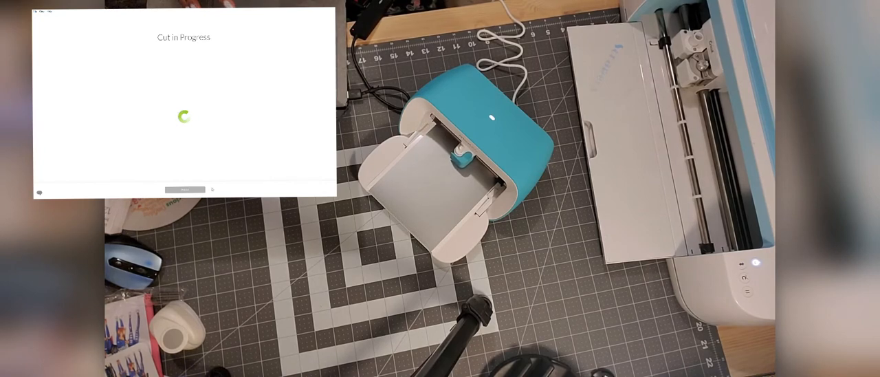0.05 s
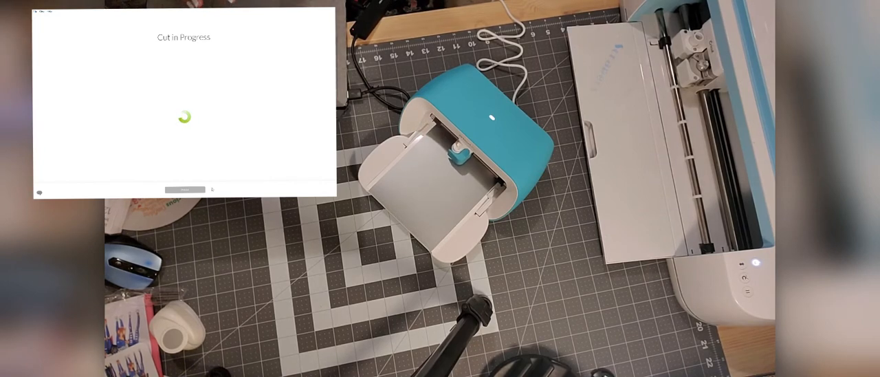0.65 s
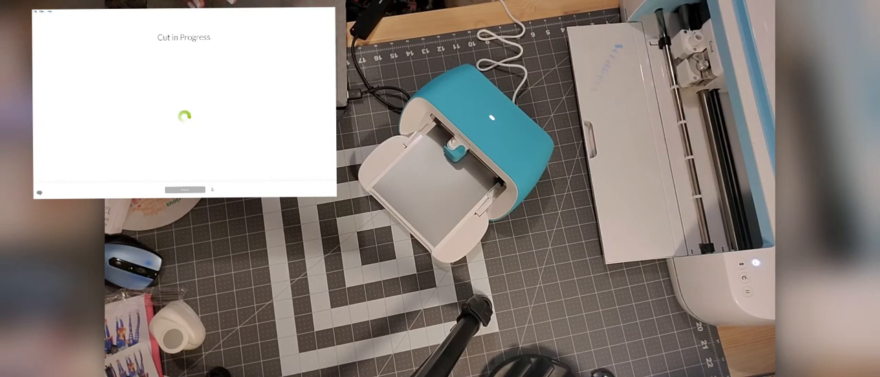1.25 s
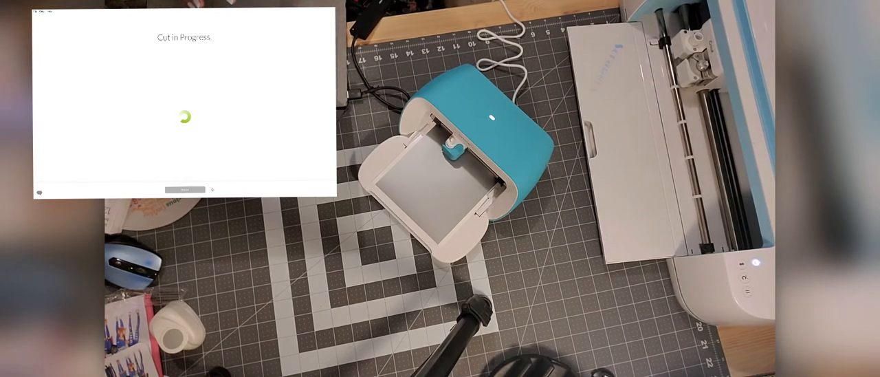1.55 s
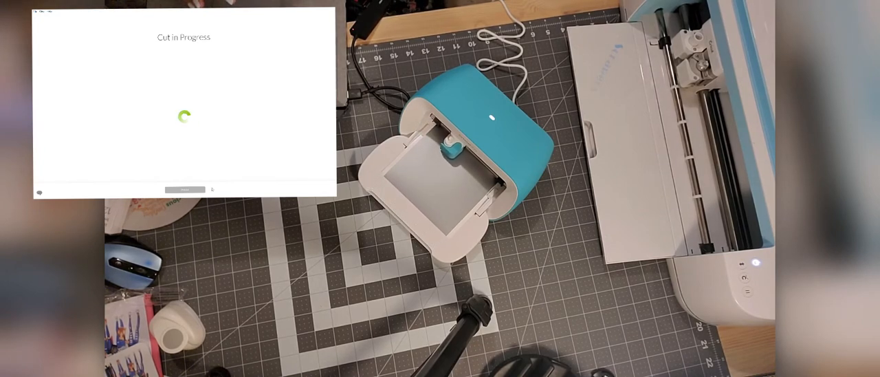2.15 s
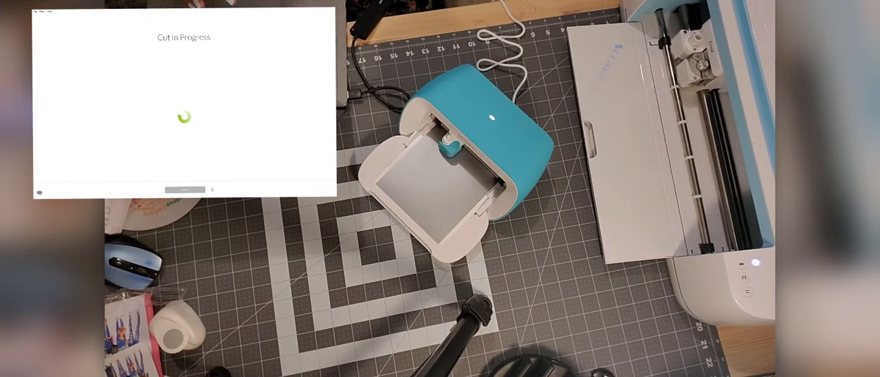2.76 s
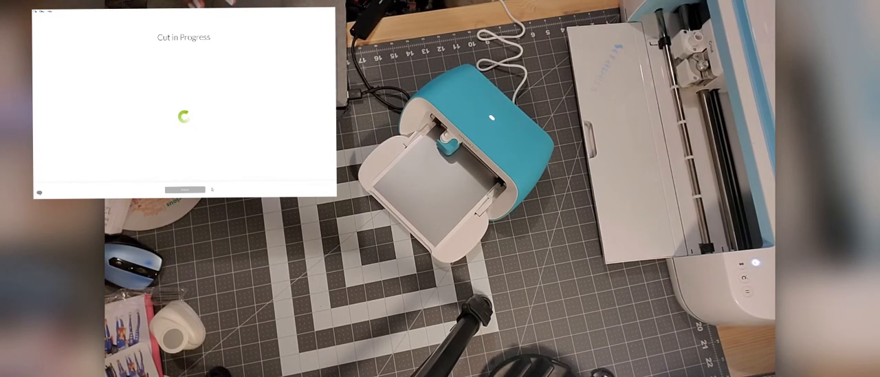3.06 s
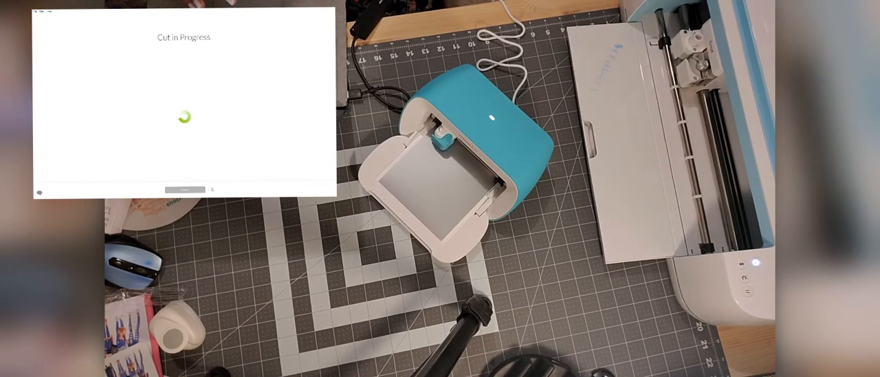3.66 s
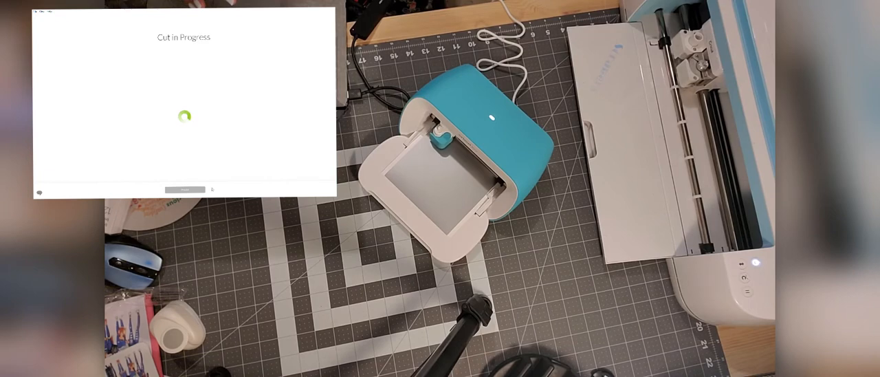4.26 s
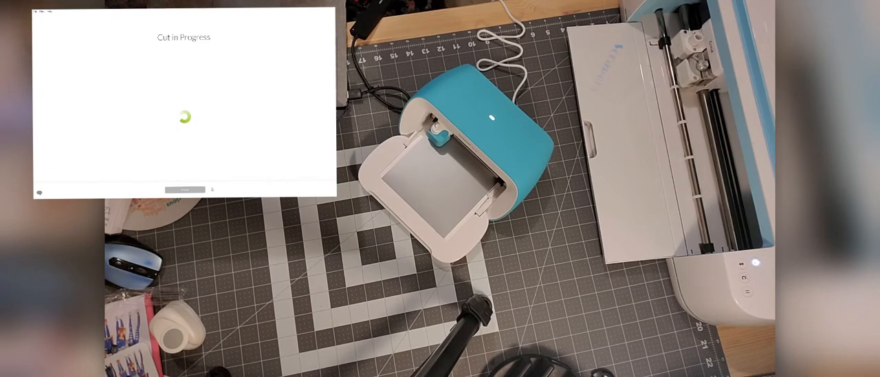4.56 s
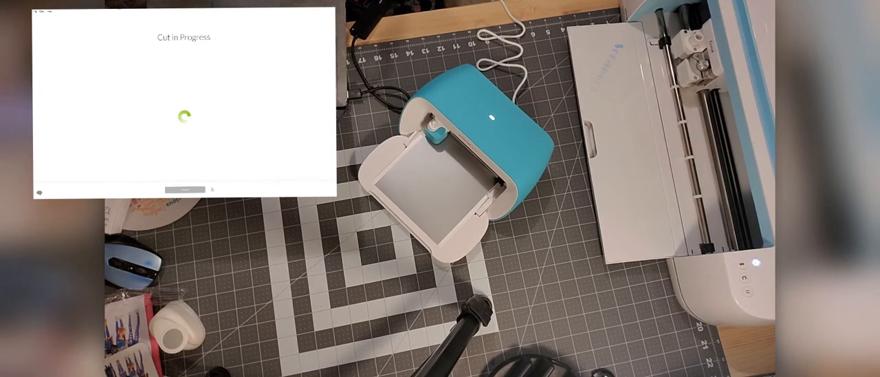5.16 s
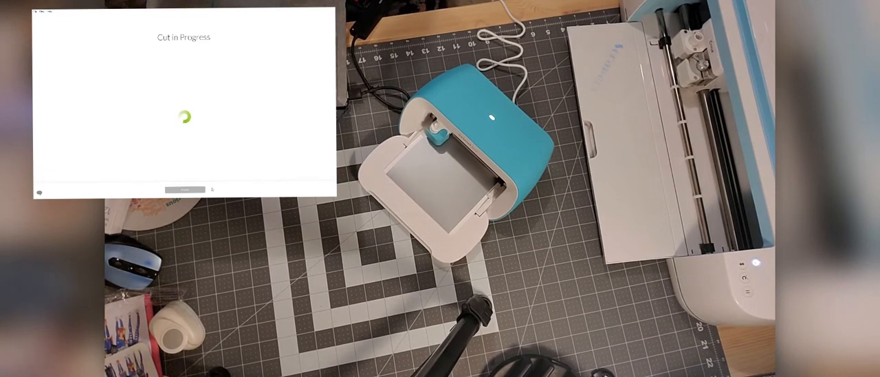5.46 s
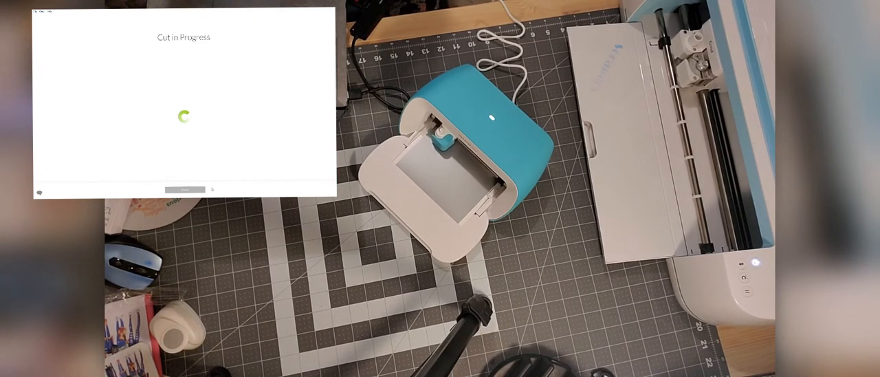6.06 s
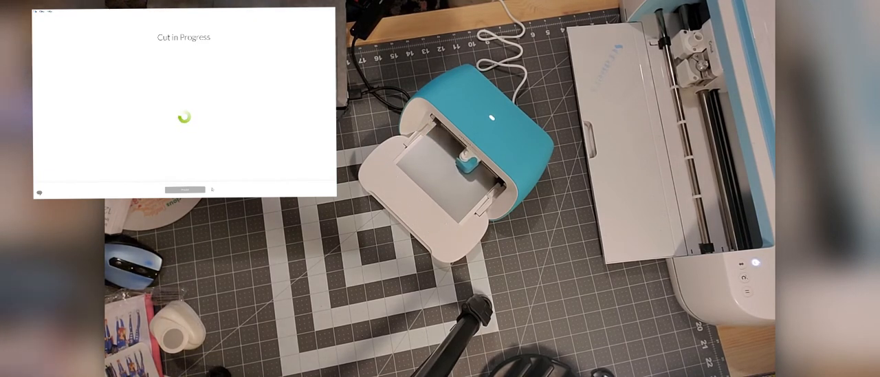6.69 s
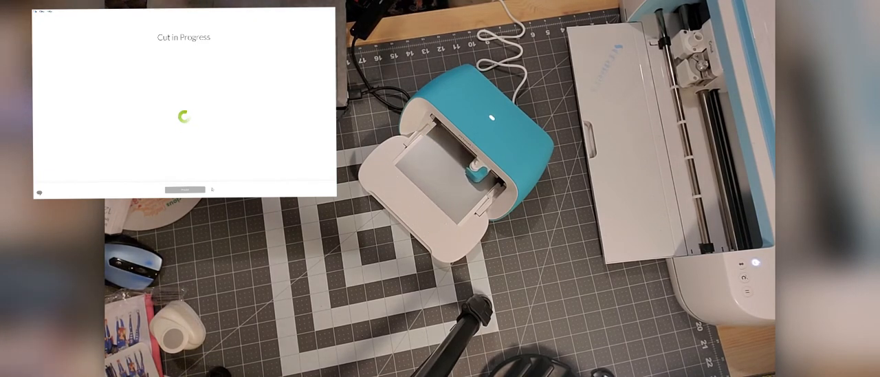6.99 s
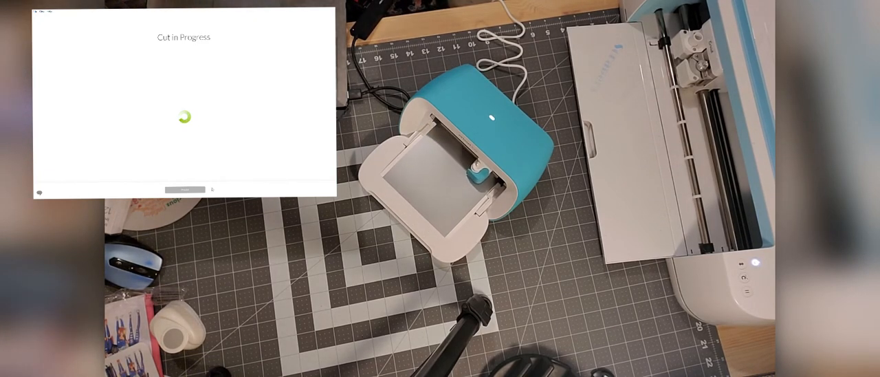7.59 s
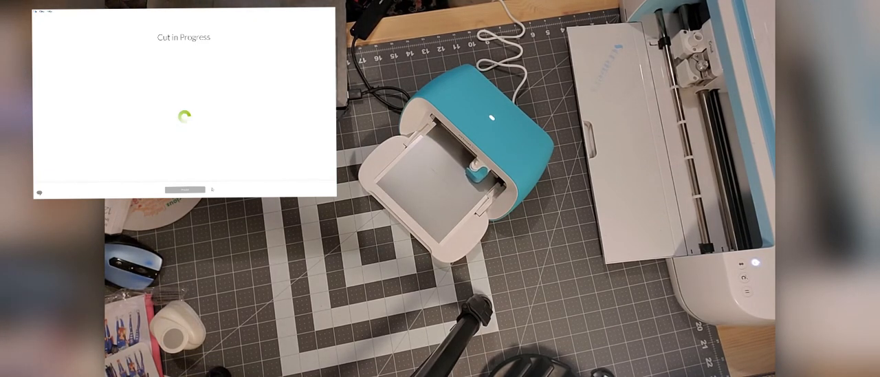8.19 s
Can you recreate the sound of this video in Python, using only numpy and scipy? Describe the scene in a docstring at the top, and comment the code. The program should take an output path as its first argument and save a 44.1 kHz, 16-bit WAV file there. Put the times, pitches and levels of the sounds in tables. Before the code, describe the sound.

Geared motors of a desktop cutter whirr in quick bursts as the blade holder clacks, followed by three longer whines and two nudges.

```python
"""First comes a low groan and a clack, as a small electric cutting machine on a desk works its blade lift.
Geared motors then jog the blade carriage and the rollers in short, rattling strokes, make three long
whining runs and end with two nudges. Gear teeth shake the plastic case, the blade scrapes and squeaks
in the sheet, and its holder clacks up and down. Underneath, the desk hums and thuds, and the
electronics that drive the motors whistle thinly."""
import sys
import numpy as np
from scipy import signal
from scipy.fft import rfft, irfft, next_fast_len
from scipy.io import wavfile
from scipy.ndimage import map_coordinates

SR = 44100
rng = np.random.default_rng(int(sys.argv[2]) if len(sys.argv) > 2 else 0)


def store_pcm(level_fs):
    """Save levels as 16-bit WAV."""
    pcm = np.round(np.clip(level_fs, -1, 1) * 32767).astype(np.int16)
    wavfile.write(sys.argv[1], SR, np.atleast_2d(pcm).T)


N = 371939


def amp(db):
    """Turns decibels into a number to multiply by."""
    return 10 ** (np.asarray(db) / 20)


def unit(x):
    """Scales a sound to an average strength (rms) of 1."""
    return x / np.sqrt(np.mean(x ** 2) + 1e-20)


def along(points, hz):
    """Reads between (frequency [Hz], value) points on a log frequency axis."""
    freqs, values = np.transpose(points)
    return np.interp(np.log(hz + 1), np.log(freqs + 1), values)


def wobble(rate, n):
    """A smooth random curve of n samples, with `rate` new values a second."""
    return map_coordinates(rng.standard_normal(int(n * rate / SR) + 4), [np.arange(n) * rate / SR])


def coloured(x, spectrum):
    """Lets x ring through an object with this tone colour: (frequency [Hz], level [dB]) points."""
    size = 4096
    cepstrum = irfft(np.log(amp(along(spectrum, np.fft.rfftfreq(size, 1 / SR)))))
    cepstrum[1:size // 2] *= 2  # folded so that the ringing comes after a blow, never before
    cepstrum[size // 2 + 1:] = 0
    return signal.fftconvolve(x, irfft(np.exp(rfft(cepstrum))))[:len(x)]


def noise(spectrum, n):
    """Noise of strength 1 with this tone colour."""
    return unit(coloured(rng.standard_normal(n), spectrum))


def add(track, start_s, sound):
    """Mixes a sound into the track at the given time."""
    start = max(round(start_s * SR), 0)
    part = sound[..., :max(N - start, 0)]
    track[..., start:start + part.shape[-1]] += part


# tone colour of the still room: (frequency [Hz], level [dB])
AIR_COLOUR = [(25, -13.5), (55, -1), (800, -20.5), (2000, -22), (15500, -37.5)]

def air():
    """The room's faint rumble and hiss, mostly the same in both ears."""
    return amp(-78) * noise(AIR_COLOUR, N) + amp(-85) * noise(AIR_COLOUR, N) * np.array([[1], [-1]])


# how long echoes last: (frequency [Hz], time to fade by 60 dB [s])
ECHO_FADE = [(150, 0.67), (1200, 0.21), (5000, 0.2), (14000, 0.13)]
# how alike the left and right echoes are: (frequency [Hz], likeness [0-1])
ECHO_LIKENESS = [(200, 0.55), (600, 0.78), (1200, 0.02)]

def room(x, wet_db, desk_gain, desk_t60):
    """Adds short echoes from desk and walls; they keep changing because the carriage moves."""
    hop = round(.3 * SR)  # new echoes every 0.3 s
    padded, wet = np.pad(x, (hop, 2 * hop)), np.zeros((2, N + 2 * SR))
    starts = np.arange(0, N + hop, hop)
    hz, t, hiss = signal.stft(rng.standard_normal((len(starts), 2, SR // 4)), SR, nperseg=256)
    alike = np.clip(along(ECHO_LIKENESS, hz), 0, 1)[:, None]
    hiss[:, 1] = alike * hiss[:, 0] + np.sqrt(1 - alike ** 2) * hiss[:, 1]
    decay = amp(-60 * t / along(ECHO_FADE, hz)[:, None]) + desk_gain * amp(-60 * t / desk_t60)
    tails = signal.istft(hiss * decay, SR, nperseg=256)[1]
    tails /= np.linalg.norm(tails, axis=2, keepdims=True)
    fade = np.sin(np.linspace(0, np.pi, 2 * hop))
    for start, tail in zip(starts, tails):
        echo = signal.fftconvolve((padded[start:start + 2 * hop] * fade)[None], tail, axes=1)
        wet[:, start + SR // 1000:][:, :echo.shape[1]] += echo
    return (x + amp(wet_db) * wet[:, hop:hop + N]) / np.hypot(1, amp(wet_db))


DRIVER_ON_S = 0.51  # the motor electronics wake up
# tone colour of the desk: (frequency [Hz], level [dB])
DESK_COLOUR = [(25, -21), (55, 2.5), (130, -3.5), (200, -6), (600, -41.5), (2000, -96.5)]
# jolts as the motors stop and turn round: (time [s], level [dB])
DESK_JOLTS = [(0.278, -56.5), (0.923, -54), (1.404, -52), (1.859, -57), (2.439, -57), (2.958, -56.5),
              (3.939, -56), (7.187, -56.5), (8.194, -52.5)]

def desk():
    """The desk hums once the motors are working; each jolt sets off a low thud that sags in pitch."""
    awake = np.interp(np.arange(N) / SR, [DRIVER_ON_S, DRIVER_ON_S + 0.26], [0, 1])
    out = awake * amp(-71.5 + 0.88 * wobble(6.7, N)) * noise(DESK_COLOUR, N)
    t = np.arange(SR // 5) / SR
    rise_s, sag_s = 0.022, 0.037
    swell = t / rise_s * np.exp(1 - t / rise_s)
    hz = 67.6 + 85.5 * np.exp(-t / sag_s)
    for start, db in DESK_JOLTS:
        tone = np.sin(2 * np.pi * np.cumsum(hz * (1 + 0.13 * wobble(43, len(t)))) / SR)
        add(out, start, amp(db) * swell * (tone / 2 + 0.71 * noise(DESK_COLOUR, len(t))))
    return out


def whistle():
    """The motor electronics give a thin, unsteady whistle, louder the faster a motor turns."""
    pitch_hz, idle_db, db_per_shaft_hz = 15110, -80.5, 0.31
    t = np.arange(N) / SR
    speeds = [np.interp(t, stroke_times(start, length), [0, stroke_hz(length), 0])
              for start, length, _, _ in CUT_STROKES + ROLLER_NUDGES]
    speeds += [np.interp(t, times, [0, hz, hz, 0]) for *times, hz, _, _, _, _ in LONG_RUNS]
    level_db = idle_db + db_per_shaft_hz * np.max(speeds, axis=0)
    level_db += 2 * wobble(18, N) + 2.5 * wobble(90, N)
    return (t > DRIVER_ON_S) * amp(level_db) * np.sin(2 * np.pi * pitch_hz * t + 1.1 * wobble(260, N))


# moans of the drive: (time [s], length [s], first pitch [Hz], last pitch [Hz], level [dB])
DRIVE_MOANS = [(0.048, 0.061, 490, 475, -60), (0.09, 0.1, 205, 179, -50.5), (0.187, 0.05, 477, 440, -51),
               (0.277, 0.048, 177, 128, -50), (0.625, 0.073, 163, 138, -57), (0.93, 0.045, 487, 350, -50)]

def moans():
    """Parts of the drive moan under load: short, low, slightly rough tones that sag."""
    out = np.zeros(N)
    for start, length, from_hz, to_hz, db in DRIVE_MOANS:
        n = int(length * SR)
        hz = np.linspace(from_hz, to_hz, n) * (1 + 0.064 * wobble(106, n))
        add(out, start, amp(db) * np.sqrt(np.hanning(n)) * np.sin(2 * np.pi * np.cumsum(hz) / SR))
    return out


# tone colours of the blade lift: (frequency [Hz], level [dB])
GROAN_COLOUR = [(35, -16), (130, -2), (190, 2), (260, -10.5), (468, -1), (620, -10), (1430, -92)]
GRIND_COLOUR = [(350, -38), (954, -1.5), (1140, -8), (1310, 3), (1600, -9.5), (1760, -15), (2320, -13.5),
                (12000, -42), (15600, -86)]
# its pushes: (time [s], length [s], groan [dB], grind [dB])
LIFT_PUSHES = [(0.076, 0.099, -56.5, -53), (0.272, 0.03, -64, -47.5), (0.905, 0.04, -48.5, -47.5),
               (0.994, 0.025, -53, -46)]

def lift():
    """Each push of the blade lift swells, holds and fades, groaning through the desk and grinding."""
    out, t = np.zeros(N), np.arange(SR // 2) / SR
    rise_s, fade_db_per_s = 0.02, 385
    for start, length, groan_db, grind_db in LIFT_PUSHES:
        effort = np.minimum(t / rise_s, 1) * amp(-fade_db_per_s * np.maximum(t - length, 0))
        groan = amp(groan_db) * noise(GROAN_COLOUR, len(t))
        grind = amp(grind_db + 3.4 * wobble(107, len(t))) * noise(GRIND_COLOUR, len(t))
        add(out, start, effort * (groan + grind))
    return out


# tone colour of the blade tip: (frequency [Hz], level [dB])
BLADE_COLOUR = [(2500, -28), (3800, -2.5), (4200, -8.5), (5300, -3.5), (6200, -20.5), (9000, -40.5)]
# moments when the blade catches: (time [s], length [s], level [dB])
BLADE_SQUEAKS = [(0.691, 0.055, -50), (1.798, 0.047, -47), (3.147, 0.067, -56.5), (3.225, 0.078, -46),
                 (4.157, 0.041, -52), (4.885, 0.063, -57.5)]

def squeaks():
    """The blade catches in the sheet: tiny slips ring its tip, and the note slides up as it lets go."""
    out = np.zeros(N)
    pitch_hz, slide_hz, scatter_hz = 5190, 121, 172
    for start, length, db in BLADE_SQUEAKS:
        n = int(length * SR)
        hz = pitch_hz + slide_hz * np.linspace(-1, 1, n) + scatter_hz * wobble(910, n)
        note = np.sin(2 * np.pi * np.cumsum(hz) / SR) * amp(4.4 * wobble(290, n))
        add(out, start, amp(db) * np.hanning(n) * unit(unit(note) + 0.91 * noise(BLADE_COLOUR, n)))
    return out


def contact(spectrum, t60, chatter):
    """One hard hit, then loose plastic chatters, fading by 60 dB in t60 seconds."""
    t = np.arange(SR // 5) / SR
    force = chatter * rng.standard_normal(len(t)) * amp(-60 * t / t60)
    force[0] += 1
    shift = np.exp(rng.normal(0, 0.014))  # each hit lands on another spot, so its colour shifts
    ring = coloured(force, [(hz * shift, db + rng.normal(0, 2)) for hz, db in spectrum])
    return ring / np.sqrt(np.mean(ring[:SR // 100] ** 2))


# tone colours of the case, the blade holder and its metal parts: (frequency [Hz], level [dB])
KNOCK_COLOUR = [(53, -47), (90, -22), (200, -26.5), (340, -27.5), (480, -14.5), (590, -21.5), (730, -1),
                (817, -14.5), (1010, 0.5), (1320, 0), (1600, -6.5), (1850, -30.5), (2000, -18.5),
                (2600, -34), (4400, -120)]
SNAP_COLOUR = [(1120, -31), (1900, -25.5), (2080, -1), (2270, -10), (2400, -0.5), (2980, -2), (3860, -10),
               (4600, -11), (7000, -19), (9100, -32), (15400, -120)]
TICK_COLOUR = [(4500, -10), (7000, 0.5), (9000, -5), (12000, -13.5), (15500, -8.5)]
# notes the holder rings with: (pitch [Hz], level [dB], time to fade by 60 dB [s])
HOLDER_NOTES = [(2970, -3.5, 0.11), (3042, 0.5, 0.07), (3434, 4, 0.054)]
# clacks of the holder: (time [s], knock [dB], snap [dB], tick [dB], ring [dB])
HOLDER_CLACKS = [(0.276, -40, -45.5, -64.5, -49), (0.612, -51, -51.5, -51.5, -55),
                 (1.008, -31.5, -38.5, -45.5, -38), (1.064, -32, -42.5, -53.5, -57),
                 (1.094, -50, -45, -55, -57), (1.566, -37.5, -50.5, -61, -55), (1.822, -35, -43, -49, -49),
                 (2.504, -35.5, -50.5, -74, -65), (2.545, -36, -52, -83.5, -64),
                 (2.799, -38, -46.5, -51, -59), (2.952, -33.5, -50, -69, -60),
                 (2.989, -30.5, -40.5, -52.5, -50), (3.237, -28, -38, -50.5, -45),
                 (3.272, -39, -44.5, -50, -47), (3.677, -39.5, -45.5, -60, -53),
                 (3.902, -35, -44, -50, -44), (4.512, -38, -51.5, -65, -57), (4.795, -43.5, -55, -68, -52),
                 (4.963, -41, -49, -59.5, -55), (4.974, -31.5, -44, -57, -51),
                 (5.007, -36.5, -43, -52, -39), (5.844, -44, -46.5, -81, -50.5),
                 (7.094, -38.5, -51, -71.5, -42.5), (7.176, -34.5, -42, -56, -44.5),
                 (7.912, -43, -56.5, -55.5, -42.5), (8.199, -31.5, -38.5, -49, -43.5),
                 (8.236, -38.5, -40.5, -43.5, -57), (8.371, -40, -51, -60, -47)]
# dull knocks from slack in the gears: (time [s], level [dB])
GEAR_KNOCKS = [(1.656, -39), (2.325, -36.5), (2.602, -41), (2.705, -35.5), (3.537, -46), (5.888, -37),
               (5.96, -37), (7.207, -45.5)]

def clacks():
    """The blade holder knocks the case, snaps, ticks and rings; slack gears add duller knocks."""
    out = np.zeros(N)
    knock_t60, knock_chatter = 0.075, 0.064
    for start, knock_db, snap_db, tick_db, ring_db in HOLDER_CLACKS:
        knock = contact(KNOCK_COLOUR, knock_t60, knock_chatter)
        snap = contact(SNAP_COLOUR, t60=0.098, chatter=0.13)
        tick = contact(TICK_COLOUR, t60=0.12, chatter=0.068)
        t, ring = np.arange(len(snap)) / SR, 0
        for hz, db, t60 in HOLDER_NOTES:
            fade = amp(db + rng.normal(0, 1.8) - 60 * t / t60)
            ring += fade * np.sin(2 * np.pi * hz * (1 + rng.normal(0, 0.0058)) * t)
        blow = amp(knock_db) * knock + amp(snap_db) * snap + amp(tick_db) * tick
        add(out, start, blow + amp(ring_db) * ring)
        add(out, start - 0.0088, amp(-13) * blow)  # a faint lead-in softens the start of each clack
    for start, db in GEAR_KNOCKS:
        add(out, start, amp(db) * contact(KNOCK_COLOUR, knock_t60, knock_chatter))
    add(out, 0.852, amp(-46) * contact(TICK_COLOUR, t60=0.093, chatter=0.12))  # the holder latches
    return out


def travel(times, shape, shaft_hz, ease):
    """Speed (0-1) and shaft turns of one slightly unsteady move; ease (0-1) smooths the braking."""
    t = np.arange(times[0], max(times[-1], times[0] + .02), 1 / SR)
    speed = np.interp(t, times, shape)
    speed += ease * (t > times[-2]) * (np.sin(np.pi / 2 * speed) ** 2 - speed)
    stumble_s, half_width_s, speed_lost = 6.225, 0.014, 0.094  # the carriage stumbles once
    speed *= 1 - speed_lost * np.exp(-((t - stumble_s) / half_width_s) ** 2)
    return speed, np.cumsum(shaft_hz * speed * (1 + .0022 * wobble(25, len(t)))) / SR


TEETH = 11  # on the gear

def teeth(turns, scatter_db, rub):
    """One blow per gear tooth, each tooth with its own strength, over constant rubbing."""
    count = np.floor(turns * TEETH).astype(int)
    due = np.flatnonzero(np.diff(count))
    wear = rng.standard_normal(TEETH)[count[due] % TEETH]
    strength, timing = rng.standard_normal((len(due), 2)).T
    hits = np.clip(due + (.0003 * SR * timing).astype(int), 0, len(turns) - 1)
    blows = np.bincount(hits, amp(scatter_db * (0.71 * wear + strength)), len(turns))
    return unit(blows - blows.mean()) + rub * rng.standard_normal(len(turns))


def mesh(turns, multiples):
    """Teeth that roll smoothly together make pure tones at multiples of the rate at which they meet."""
    return np.sin(2 * np.pi * TEETH * np.outer(multiples, turns)).sum(0)


def driven(sound, speed, power):
    """Makes a sound grow with speed, to a strength of about 1 at full speed."""
    envelope = speed ** power
    return unit(sound * envelope) * np.sqrt(np.mean(envelope ** 2))


def stroke_times(start, length):
    """When a stroke starts, reaches top speed and stops."""
    return [start, start + .435 * length, start + length]


def stroke_hz(length):
    """Top shaft speed in turns a second: a longer stroke has time to get faster."""
    return 21.95 * (length / .3) ** .35


# tone colours of the case as the motors change speed: (frequency [Hz], level [dB])
JOG_CASE = [(40, -37), (80, -20), (180, -38.5), (280, -20), (400, -21.5), (490, -13.5), (580, -23.5),
            (700, -8.5), (800, -19), (890, -1), (980, -5), (1100, 1), (1320, 4.5), (1420, -5.5),
            (1520, 2.5), (1680, -32), (1850, -22), (2400, -48)]
NUDGE_CASE = [(40, -25), (330, -23), (470, -12), (600, -29), (710, -14.5), (800, -34), (875, 3.5),
              (980, -8), (1080, -3.5), (1290, 10), (1450, -9.5), (1740, -12), (2000, -38.5)]
# tone colour of blade, belt and mat sliding in a stroke: (frequency [Hz], level [dB])
STROKE_SCRAPE = [(1060, -15.5), (1800, 4), (1950, -23.5), (2090, -0.5), (3490, -2), (4270, -9),
                 (5040, -6.5), (6610, -15), (14500, -40)]
# short cuts, and rollers nudging the mat: (time [s], length [s], gears [dB], scrape [dB])
CUT_STROKES = [(0.629, 0.18, -37.5, -47.5), (0.809, 0.083, -42, -46), (0.863, 0.12, -47, -46),
               (1.117, 0.27, -35.5, -52), (1.348, 0.098, -46.5, -64), (1.402, 0.19, -37.5, -54.5),
               (1.539, 0.36, -34, -50), (1.924, 0.33, -34.5, -48.5), (2.224, 0.3, -36.5, -49.5),
               (2.573, 0.29, -34, -49), (2.744, 0.23, -39, -55.5), (3.019, 0.27, -37.5, -53),
               (3.269, 0.27, -38, -58), (3.563, 0.18, -38, -60), (3.638, 0.29, -33.5, -50),
               (3.79, 0.27, -50, -70), (4.01, 0.29, -38, -55.5), (4.274, 0.25, -37.5, -51),
               (4.519, 0.087, -44, -71), (4.6, 0.24, -42, -59), (4.76, 0.32, -39.5, -55.5),
               (5.062, 0.15, -39, -58)]
ROLLER_NUDGES = [(8.007, 0.14, -35.5, -54.5), (8.262, 0.24, -34, -54)]

def strokes(table, case, whirr_db):
    """Short jogs: the motors speed up and brake at once, so the rattle and whirr rise and fall."""
    out = np.zeros(N)
    for start, length, gears_db, scrape_db in table:
        speed, turns = travel(stroke_times(start, length), [0, 1, 0], stroke_hz(length), ease=.25)
        rattle = driven(coloured(teeth(turns, scatter_db=4.5, rub=1.0), case), speed, power=0.95)
        grip = amp(1.66 * wobble(69.0, len(speed)))  # the blade drags unevenly
        edge = [(hz, db + rng.normal(0, 1.8)) for hz, db in STROKE_SCRAPE]  # a new angle for each cut
        scrape = driven(coloured(grip * teeth(turns, scatter_db=5.2, rub=1.2), edge), speed, power=1.37)
        whirr = driven(coloured(mesh(turns, [3, 4, 5, 6, 7]), case), speed, power=1.12)
        gears = (rattle + amp(whirr_db) * whirr) / np.hypot(1, amp(whirr_db))
        add(out, start, amp(gears_db) * gears + amp(scrape_db) * scrape)
    return out


# tone colour of the sliding in a long run: (frequency [Hz], level [dB])
LONG_SCRAPE = [(1060, -23.5), (1800, 6), (1850, -3.5), (3320, -2), (3530, -0.5), (4270, -8), (4790, -2),
               (5900, -13), (9000, -18.5), (14500, -39.5)]
# tone colour of the rattling case in each run: (frequency [Hz], level [dB])
FEED_RATTLE = [(40, -38), (80, -38), (250, -33), (580, -30), (700, -17.5), (840, -24), (900, -3.5),
               (1120, -7.5), (1260, 3), (1400, -10.5), (1540, -9), (1700, -35), (2100, -45), (2300, -13.5),
               (2420, -26), (2650, -18), (2900, -47.5)]
CROSS_RATTLE = [(40, -31), (80, -38), (280, -37), (580, -30), (730, -14), (850, -17), (1000, -11.5),
                (1170, 0), (1320, -9), (1410, -6.5), (1520, -4), (1650, -26), (1760, -24), (1830, -55),
                (2400, -53)]
RETURN_RATTLE = [(40, -41), (80, -36), (250, -34.5), (580, -34), (700, -25.5), (860, -32.5), (1010, -14),
                 (1120, -30.5), (1280, 2), (1350, -14.5), (1430, -23), (1600, -24), (1950, -32),
                 (2400, -38), (2660, -25.5), (3300, -50)]
# gear tones in each run: (pitch [cycles per shaft turn, played rounded], level [dB], left over right [dB])
FEED_WHINE = [(22, -55, 3), (30, -46.5, 2), (33, -49.5, 8), (41, -59, 8), (44, -34.5, -3.5), (52, -48, -9)]
CROSS_WHINE = [(11, -62, -2.5), (21, -57.5, -9), (22, -46, -12), (27, -56, -10), (32, -50, -5.5),
               (33, -26, 21), (41, -43, -10), (42, -45.5, 1.5), (44, -41.5, 1), (89, -62, 2),
               (98.8, -55.5, 4)]
RETURN_WHINE = [(22, -58.5, 4), (33, -46.5, 7), (35, -47.5, -2), (44, -34.5, 1), (90, -60.5, 1)]
# rollers feed, carriage crosses, rollers return: (start [s], full speed [s], brake [s], stop [s],
# shaft speed [Hz], rattle [dB], scrape [dB], whirr [dB], sway of the off-centre gear [turns])
LONG_RUNS = [(5.069, 5.285, 5.647, 5.878, 29.48, -35, -54, -32.5, 0.00062),
             (5.885, 6.09, 6.942, 7.17, 35.35, -35, -47, -35.5, .0004),
             (7.298, 7.479, 7.765, 8.04, 29.57, -38, -60, -37, 0.0027)]

def runs():
    """Long moves: the gears whirr up, whine over a steady rattle and scrape, then whirr down."""
    rough, whine = np.zeros(N), np.zeros((2, N))
    voices = [(FEED_WHINE, FEED_RATTLE, JOG_CASE), (CROSS_WHINE, CROSS_RATTLE, JOG_CASE),
              (RETURN_WHINE, RETURN_RATTLE, NUDGE_CASE)]
    flutter_db, shimmer_db = 0.43, 0.8
    for run, (tones, rattle_case, whirr_case) in zip(LONG_RUNS, voices):
        *times, shaft_hz, rattle_db, scrape_db, whirr_db, sway = run
        speed, turns = travel(times, [0, 1, 1, 0], shaft_hz, ease=1)
        settled = speed ** 12  # the teeth roll cleanly only near full speed
        rattle = driven(coloured(teeth(turns, scatter_db=2.5, rub=1.7), rattle_case), settled, power=.5)
        drag = teeth(turns, scatter_db=3.5, rub=1.45) * amp(0.6 * wobble(59.4, len(speed)))
        scrape = driven(coloured(drag, LONG_SCRAPE), speed, power=1.2)
        gears = mesh(turns, [4, 5, 6]) + 7 * teeth(turns, scatter_db=3, rub=1)
        whirr = driven(coloured(gears, whirr_case), speed, power=1.17) * np.sqrt(1 - settled)
        add(rough, times[0], amp(rattle_db) * rattle + amp(scrape_db) * scrape + amp(whirr_db) * whirr)
        swayed = turns + sway * np.sin(2 * np.pi * turns)  # runs ahead and falls back once a turn
        swayed += 0.00044 * wobble(110, len(speed))  # the gears wander in their slack
        for per_turn, db, pan_db in tones:
            flutter = amp(flutter_db * wobble(12.3, len(speed)) + shimmer_db * wobble(68.8, len(speed)))
            tone = np.sqrt(2) * np.sin(2 * np.pi * (round(per_turn) * swayed + rng.random()))
            ears = unit(amp([[pan_db / 2], [-pan_db / 2]]))
            add(whine, times[0], ears * amp(db) * tone * flutter * settled)
    return rough, whine


def scene():
    """The machine stands slightly to the left, so that side hears it louder and earlier."""
    rough, whine = runs()
    cuts = strokes(CUT_STROKES, JOG_CASE, whirr_db=-1.5)
    nudges = strokes(ROLLER_NUDGES, NUDGE_CASE, whirr_db=-2)
    moving = cuts + nudges + squeaks() + rough + lift() + whistle()
    machine = room(moving, wet_db=3, desk_gain=2.46, desk_t60=0.026)
    machine += room(clacks(), wet_db=3, desk_gain=3.85, desk_t60=0.02)
    left, right = machine * amp([[.9], [-.9]]) + whine + moans() + desk()
    right = np.pad(right, (4, 0))[:N]  # 4 samples later
    return np.array([left, right]) + air()


def record(dry):
    """Cuts away the very highest treble."""
    size, top_hz = next_fast_len(N + 8192), 15850
    return irfft(rfft(dry, size) * (np.fft.rfftfreq(size, 1 / SR) < top_hz), size)[:, :N]


dry = scene()
out = record(dry)
store_pcm(out)
```